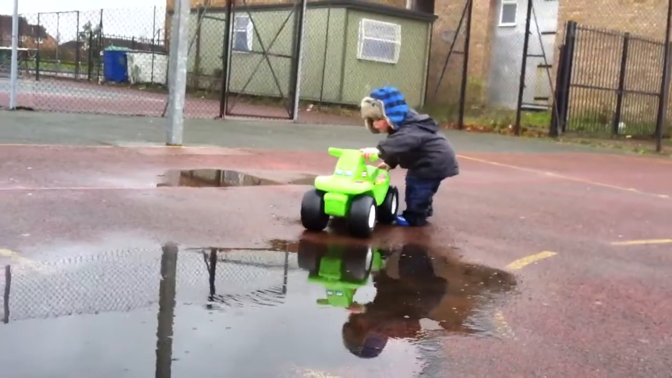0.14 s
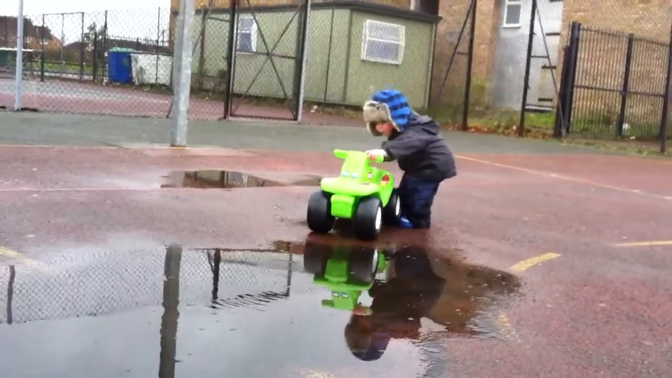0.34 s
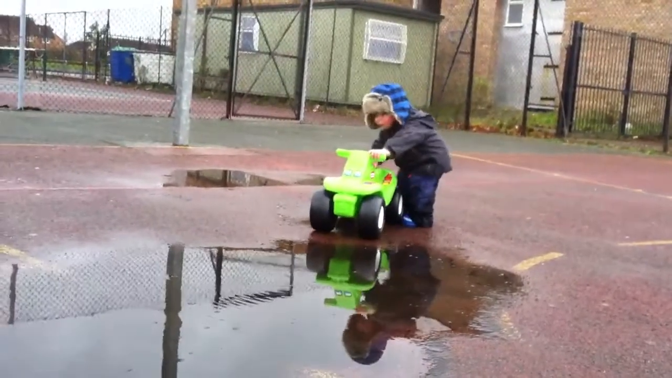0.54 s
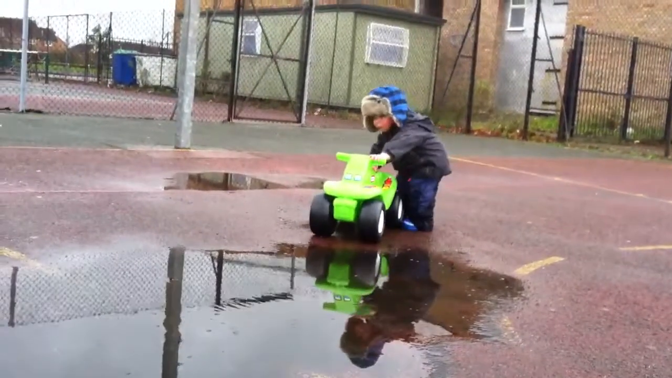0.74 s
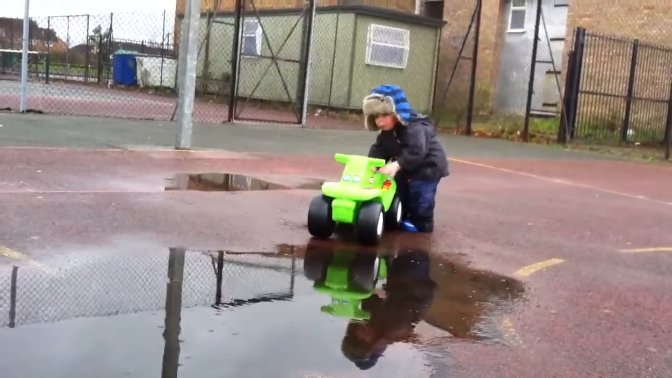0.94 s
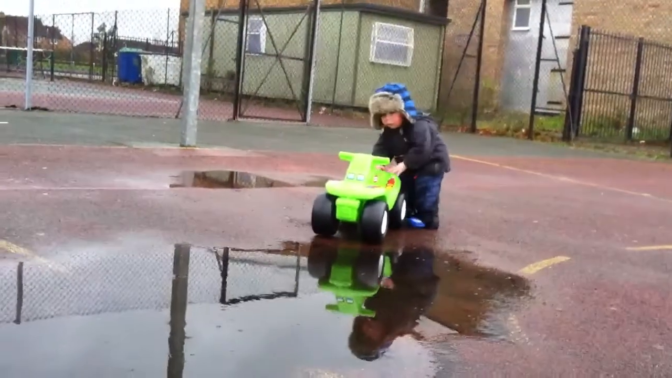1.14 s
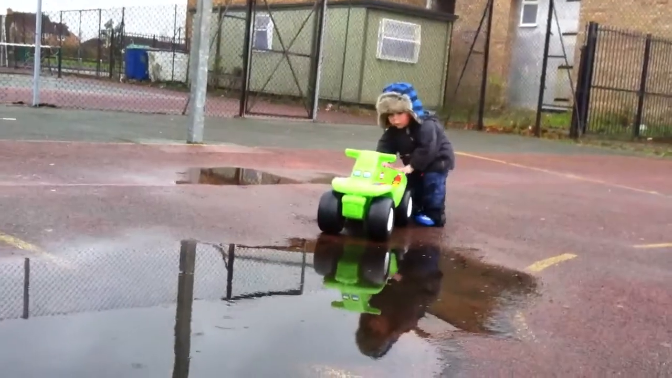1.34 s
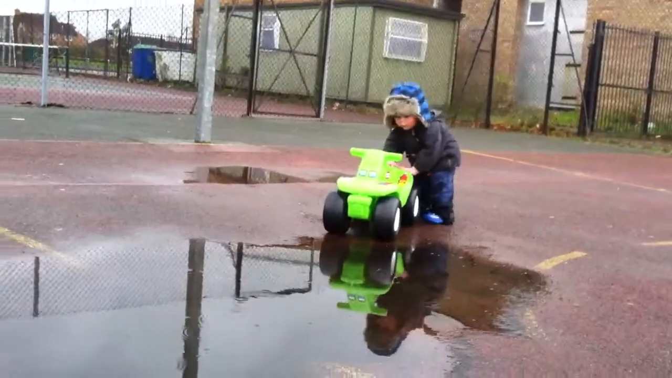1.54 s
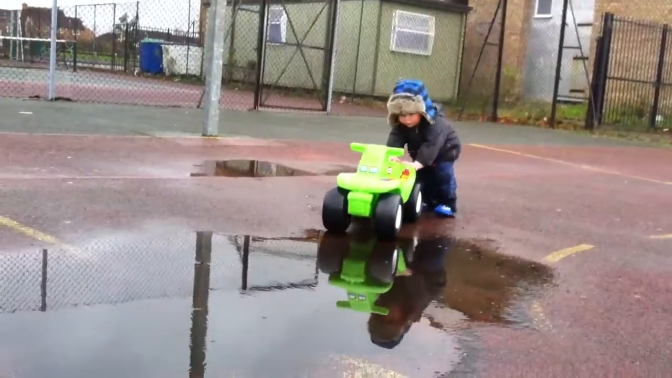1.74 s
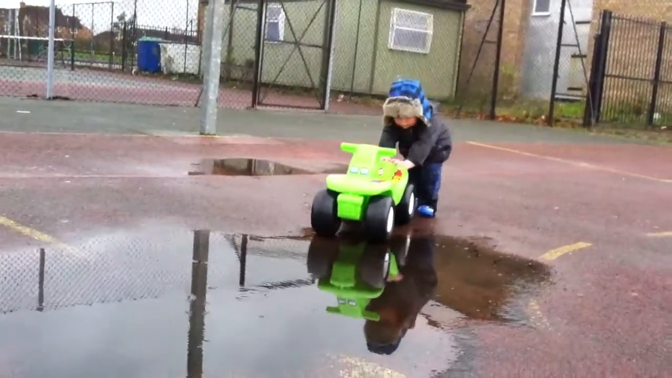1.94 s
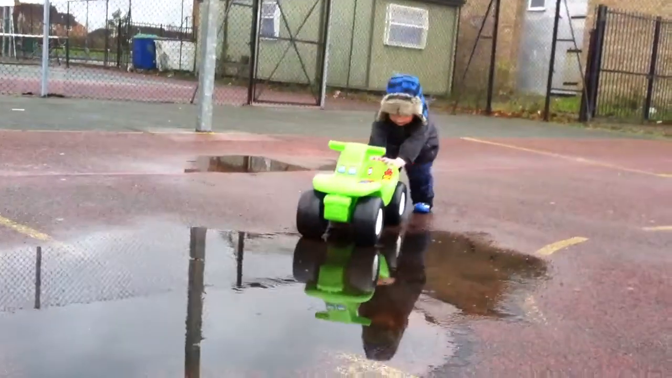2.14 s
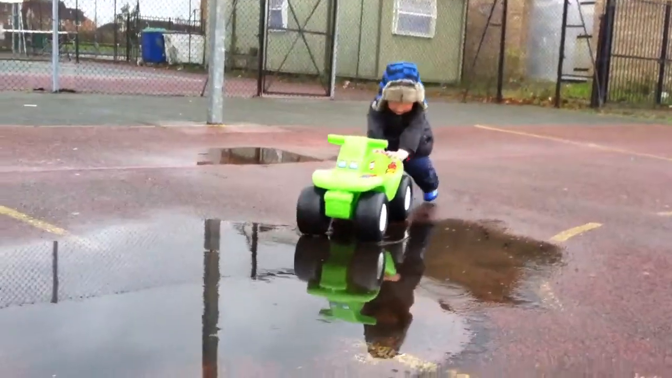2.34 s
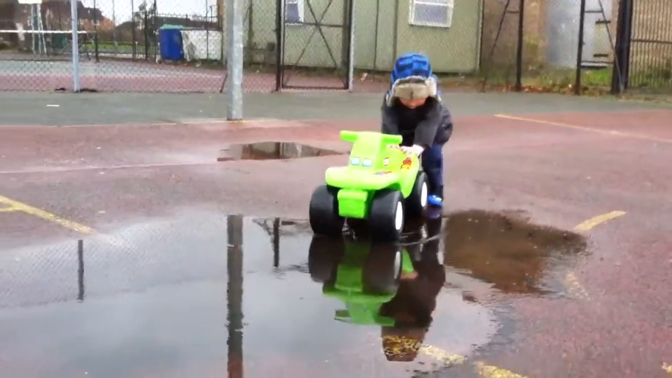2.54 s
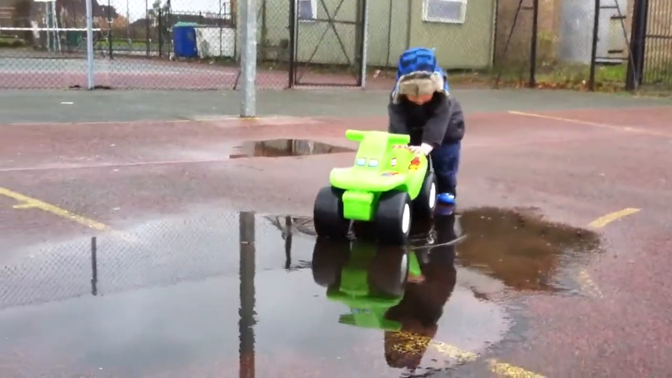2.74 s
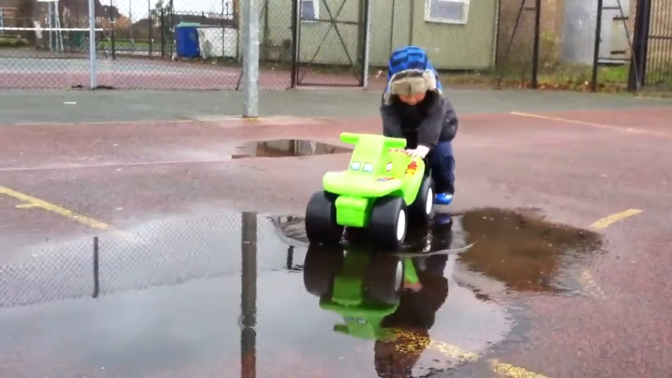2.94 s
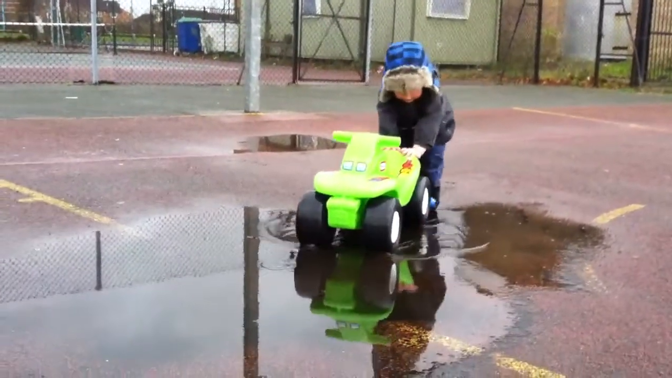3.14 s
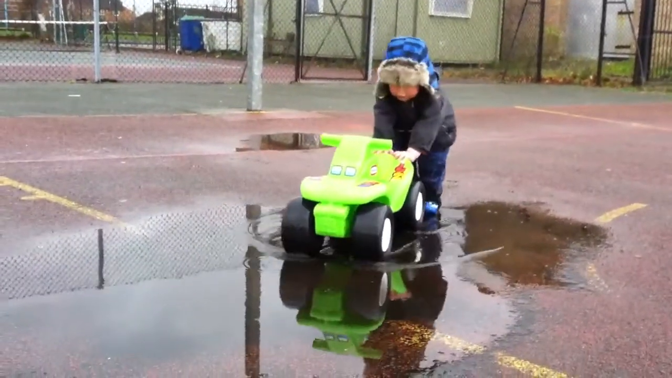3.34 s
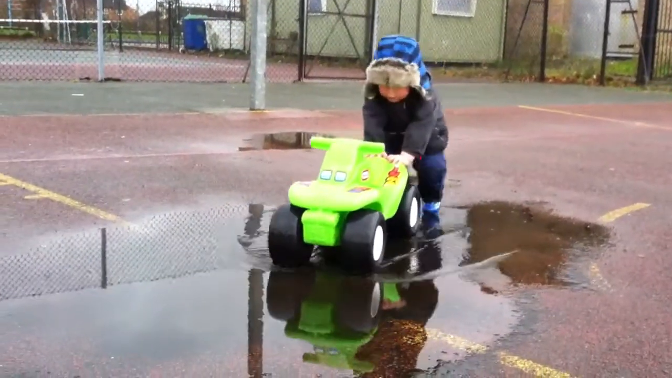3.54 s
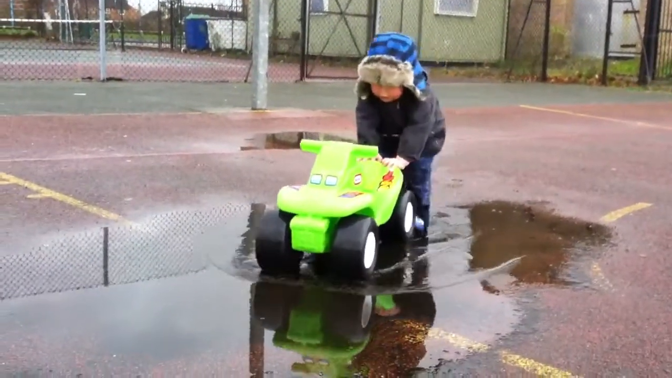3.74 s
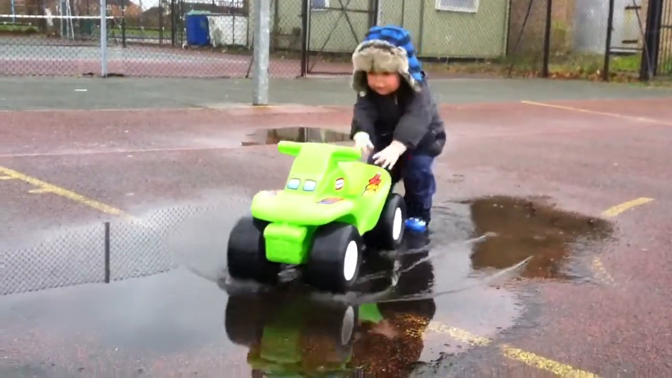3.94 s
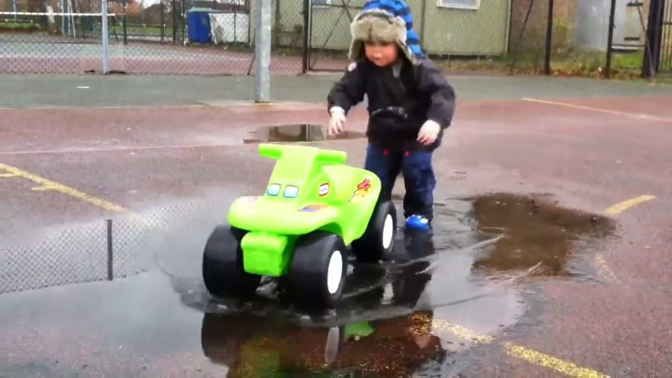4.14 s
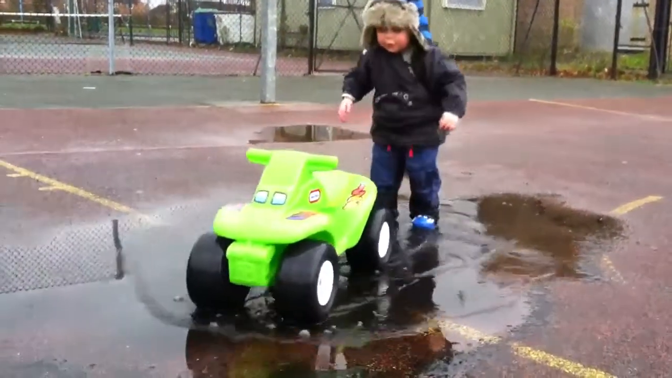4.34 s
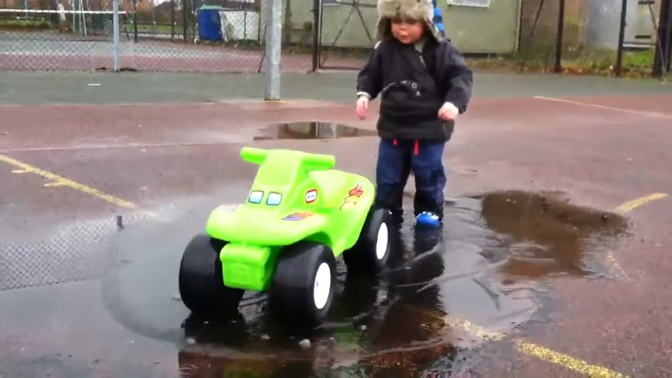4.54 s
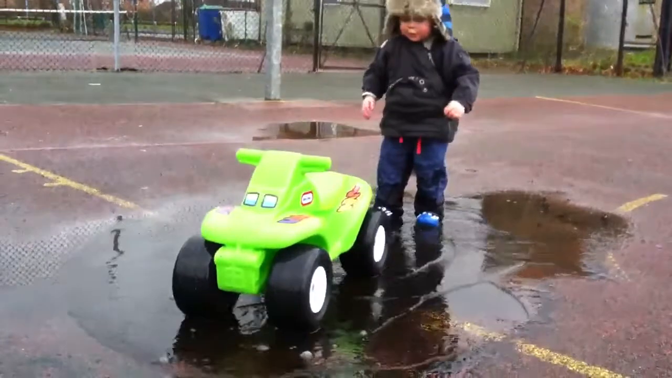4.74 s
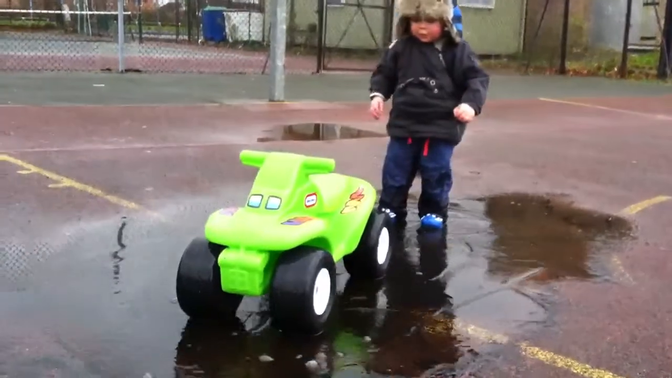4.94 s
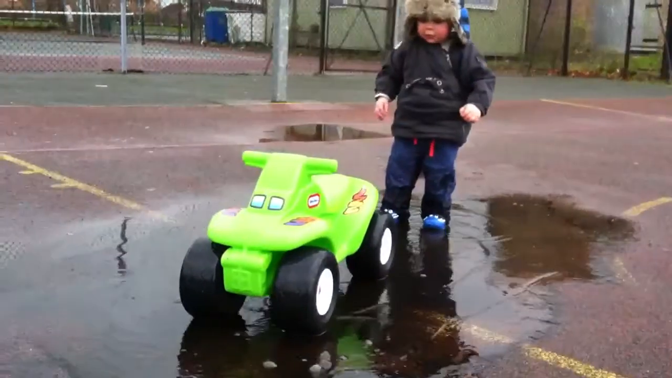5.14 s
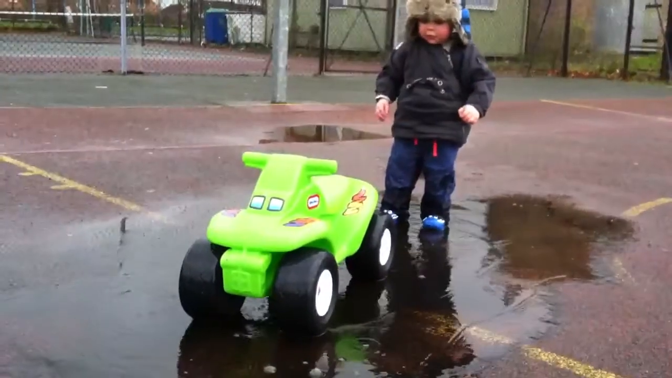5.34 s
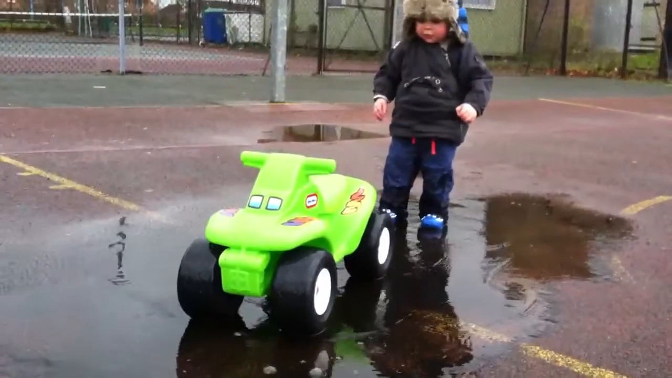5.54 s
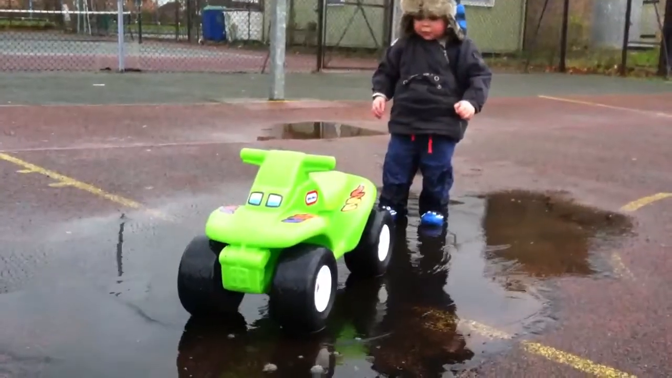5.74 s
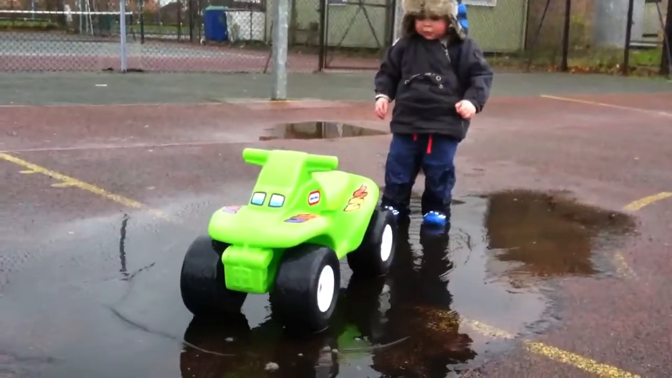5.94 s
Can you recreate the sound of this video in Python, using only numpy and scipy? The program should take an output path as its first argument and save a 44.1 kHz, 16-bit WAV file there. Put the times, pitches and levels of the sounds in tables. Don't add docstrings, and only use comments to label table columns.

```python
import sys
import numpy as np
from scipy import signal
from scipy.io import wavfile
from scipy.ndimage import uniform_filter1d

SR = 44100
rng = np.random.default_rng(int(sys.argv[2]) if len(sys.argv) > 2 else 0)


def natural_amplitude(level_db):
    exponent = np.asarray(level_db, float) / 20
    return 10 ** exponent


def dump(signal):
    limited = np.clip(np.atleast_2d(signal).T, -1, 1)
    pcm = np.round(limited * 32767).astype(np.int16)
    wavfile.write(sys.argv[1], SR, pcm)


N = 264159

# pitch_hz, width_hz, level_db
SHELL_MODES = [(280, 36, 2), (410, 80, 0.5), (659, 62, 2.5), (950, 250, -11), (1190, 156, -10)]
# pitch_hz, width_hz, level_db
AXLE_MODES = [(1580, 47, 4), (1754, 97, -1), (2173, 400, -6)]
# pitch_hz, width_hz, level_db
PANEL_MODES = [(3180, 250, 6.5), (4670, 84, 6.5), (7600, 340, -14), (10100, 4300, 3.5)]


def rms_one(x):
    return x / np.sqrt(np.mean(x ** 2) + 1e-20)


def in_time(rows):
    s, *columns = np.transpose(rows)
    return [np.interp(np.arange(N) / SR, s, c) for c in columns]


def cut(x, hz, kind, order=2):
    sos = signal.butter(order, np.clip(hz, 10, .45 * SR), kind, fs=SR, output="sos")
    return signal.sosfilt(sos, x)


def drift(rate_hz):
    r = np.exp(-80 * np.pi * rate_hz / SR)
    slow = signal.lfilter([1], [1, -2 * r, r * r], rng.standard_normal(N // 40 + 2002))[2000:]
    return np.interp(np.arange(N) / 40, np.arange(len(slow)), rms_one(slow))


def resonate(x, modes):
    out = 0
    for k, (hz, width_hz, level_db) in enumerate(modes):
        r = np.exp(-np.pi * width_hz / SR)
        b = [(1 - r * r) / 2, 0, (r * r - 1) / 2]
        a = [1, -2 * r * np.cos(2 * np.pi * hz / SR), r * r]
        out = out + (-1) ** k * natural_amplitude(level_db) * signal.lfilter(b, a, x + 1e-18)
    return out


def grains(per_s, spread_db):
    sizes = natural_amplitude(spread_db * np.minimum(rng.exponential(1, N), 4)) * rng.choice([-1, 1], N)
    return rms_one(sizes * (rng.random(N) < per_s / SR))


def add(track, s, piece):
    i = max(round(s * SR), 0)
    track[i:i + len(piece)] += piece[:N - i]


def lasting(events, t60_s):
    return [(*row, t60_s) for row in events]


def blows(events, rise_cycles, wobble, apart=0.227):
    out, t = np.zeros(N), np.arange(round(.2 * SR)) / SR
    chance = rng.uniform(-1.28, 1, (len(events), 2))
    for (s, peak_db, hz, t60_s), (detune, turn) in zip(events, chance):
        swell = 1 - np.exp(-(t * hz / rise_cycles) ** 2)
        shape = swell * natural_amplitude(-60 * t / max(t60_s, .008))
        partner = np.sin(2 * np.pi * hz * (1 + apart * detune) * t + np.pi * turn)
        tone = np.sin(2 * np.pi * hz * t) + wobble * partner
        add(out, s, natural_amplitude(peak_db) * tone * shape / shape.max())
    return out


def crushed():
    # start_s, peak_db, bright_db, t60_s
    cracks = [(.058, -28.5, -19.5, 0.037), (.167, -37, -3, 0.017), (.36, -37, -4, 0.04),
              (1.6278, -22.5, -23, 0.043), (1.6356, -27.5, -18, 0.041), (1.691, -35.5, -4, 0.035),
              (1.771, -20, -28, 0.057), (1.7908, -33, -23, 0.07), (1.8895, -31, -19, 0.068),
              (2.064, -32, -10.5, 0.036), (2.0747, -22.5, -10, 0.026), (2.2183, -32.5, -8, 0.03),
              (2.299, -39.5, -20, 0.056), (2.4842, -43, 6, 0.0048), (2.6323, -26, -16, 0.029),
              (2.6546, -39, 5, 0.062), (2.8344, -32, -3.5, 0.05), (2.8422, -29.5, -7, 0.026),
              (2.8883, -33, -8.5, 0.045), (3.0437, -31.5, -2, 0.022), (3.0819, -33.5, -6, 0.028),
              (3.1397, -37.5, 2, 0.027), (3.1844, -32.5, -7.5, 0.032), (3.644, -33.5, -6, 0.041),
              (3.895, -24, -3, 0.023), (3.8998, -29, 10, 0.031), (3.939, -27, -10.5, 0.036),
              (4.0402, -37.5, 0.5, 0.076), (4.543, -31.5, -14, 0.044)]
    # start_s, peak_db, bright_db
    grinds = [(.136, -41, -6), (.194, -36, -11), (0.261, -42, -7), (.283, -44, -3), (0.311, -38.5, -8.5),
              (.3314, -43, -12), (.742, -48.5, -10), (0.884, -45.5, -16), (1.6544, -46, -5),
              (1.716, -34.5, -6.5), (1.749, -38, -14), (1.8497, -34.5, -13), (2.0465, -43.5, -27),
              (2.526, -42, -4), (3.008, -38, -2.5), (3.462, -32, -18), (3.581, -37.5, -4),
              (3.839, -33, -14), (4.128, -42.5, -9), (4.315, -37, -11.5), (4.336, -44, -9),
              (4.479, -42.5, -15), (4.811, -45, -7)]
    # start_s, peak_db, bright_db
    ticks = [(0.22, -38, -6), (0.369, -45, -4), (0.6132, -43, -7), (0.781, -40, -5), (.7395, -46, -9),
             (.761, -45, -2), (.791, -48, -4), (1.981, -42, -15), (1.938, -46, -8), (.204, -57, -8),
             (.9105, -46, -7), (0.956, -44.5, -17), (1.1992, -43, -27), (1.2304, -43.5, -23),
             (1.8094, -32, -15), (1.927, -38, -7.5), (2.153, -35, -17), (2.3196, -36, -10.5),
             (2.734, -41, -20), (2.811, -37, -15), (2.99, -41, -18), (3.205, -42, -1), (3.3243, -48, -6),
             (3.414, -45.5, 2.5), (3.701, -39, -25), (3.7808, -44, -9), (3.8272, -36.5, -4.5),
             (3.978, -32, -12), (4.0187, -36, -17), (4.033, -21, -5), (4.042, -36, 5), (4.054, -53, -11),
             (3.908, -43, -2), (3.93, -35, -3), (4.373, -41, -24), (4.437, -36.5, -14),
             (4.647, -37.5, -10.5), (4.8506, -38.5, -9), (2.556, -56, -10), (2.679, -45, -17),
             (2.858, -29.5, -13), (2.91, -45, -11), (3.272, -45, -2), (3.515, -37, -11), (3.604, -50, -17),
             (3.713, -52, -19), (4.175, -45, -16), (4.298, -49, -14), (4.355, -64, -12), (4.503, -56, -18),
             (4.562, -42, -15), (.373, -49, -8)]
    rows = cracks + lasting(grinds, t60_s=0.079) + lasting(ticks, t60_s=.028)
    return [(s, db, bright_db, -47 + 0.72 * (db + 32.0) - db, t60_s) for s, db, bright_db, t60_s in rows]


def crunches(uneven_db):
    # low_hz, high_hz, bright_share (0-1), level_db
    rasp_bands = [(2080, 4000, 0, -9.5), (3535, 6240, 0.15, -5), (5410, 8250, 0.6, -3),
                  (7380, 11200, 0.73, -0.5), (9870, 14400, 0.7, -11)]
    # start_s, peak_db
    splits = [(.1685, -33), (1.631, -31), (1.637, -31), (1.639, -26), (1.770, -31), (2.0775, -24.5),
              (2.0795, -27), (2.301, -33), (2.4865, -32), (2.8445, -25), (3.046, -30), (3.0845, -33),
              (3.1865, -33), (3.9017, -18), (4.0352, -26), (4.0432, -26)]
    # start_s, peak_db
    splinters = [(0.0618, -36), (0.1404, -36), (0.2039, -38), (0.2199, -41), (0.3324, -39), (0.6163, -44),
                 (0.7402, -47), (0.9123, -49), (1.1983, -48), (1.2311, -45), (1.6965, -30), (1.724, -34.5),
                 (1.7513, -36), (1.7724, -31), (1.8094, -41), (1.8904, -41), (2.2198, -34), (2.319, -33),
                 (2.6324, -34.5), (2.6563, -30), (2.7332, -45), (2.8903, -33), (3.1388, -35),
                 (3.465, -34.5), (3.6461, -37), (3.7114, -50), (3.8397, -41), (3.9409, -38), (3.9789, -41),
                 (4.1265, -43), (4.4414, -51), (4.5455, -47), (4.6514, -47), (4.8524, -53)]
    swell_share, stop_power = .11, 1.9
    events = crushed()
    bands = np.zeros((len(rasp_bands), N))
    axle, snaps = np.zeros((2, N))
    t = np.arange(round(.2 * SR)) / SR
    colour = rng.standard_normal((len(events), len(rasp_bands)))
    for (s, peak_db, bright_db, axle_db, t60_s), luck in zip(events, colour):
        swell = np.minimum(t / np.clip(swell_share * t60_s, .001, .012), 1)
        shape = natural_amplitude(peak_db - 60 * (t / max(t60_s, .005)) ** stop_power) * swell
        add(axle, s, shape * natural_amplitude(axle_db))
        for band, (low, high, share, level_db), own in zip(bands, rasp_bands, luck):
            add(band, s, shape * natural_amplitude(level_db + share * bright_db + uneven_db * own))
    for s, peak_db in splits + [(s, db - 2.0) for s, db in splinters]:
        add(snaps, s, natural_amplitude(peak_db + 7) * np.ones(1))

    crackle = natural_amplitude(2.5 * drift(200)) * grains(per_s=4500, spread_db=3.5)
    crackle = crackle + .15 * rng.standard_normal(N)
    crackle = crackle / np.sqrt(uniform_filter1d(crackle ** 2, size=500))
    rasp = sum(cut(band * crackle, [low, high], "band")
               for band, (low, high, *_) in zip(bands, rasp_bands))
    rasp = rasp + natural_amplitude(-9.0) * resonate(rasp, PANEL_MODES)
    axle_ring = natural_amplitude(11.5) * resonate(axle * crackle, AXLE_MODES)
    return rasp + axle_ring + cut(snaps, [2500, 12500], "band")


def rumble_level():
    # start_s, rumble_db
    speed_curve = [(0, -56), (.08, -51.5), (.37, -53.5), (.41, -66.5), (1.6, -68), (1.82, -47.5),
                   (1.92, -57.5), (2.07, -50.5), (2.3, -47.5), (2.6, -52.5), (3.1, -53), (3.59, -48.5),
                   (3.74, -52.5), (4.05, -41), (4.44, -52.5), (4.59, -53.5), (4.85, -70), (5.99, -70)]
    return in_time(speed_curve)[0]


def grit_level(rumble_db):
    depth = np.interp(np.arange(N) / SR, [3.8, 4.6], [0, 1])
    under_db, most_db, drowned_db = 15, -65, 4
    return np.minimum(rumble_db - under_db, most_db) - drowned_db * depth


def rolling(rumble_db, grit_db, ring_db):
    clumps = natural_amplitude(3.5 * drift(25))
    rumble = rms_one(resonate(clumps * grains(per_s=900, spread_db=2.0), SHELL_MODES))
    ring = rms_one(resonate(clumps * grains(per_s=270, spread_db=-4.0), AXLE_MODES))
    fizz = cut(natural_amplitude(4.0 * drift(37)) * grains(per_s=4900, spread_db=3.0), [2000, 13000], "band")
    fizz = rms_one(fizz + natural_amplitude(-14) * resonate(fizz, PANEL_MODES))
    return natural_amplitude(rumble_db) * rumble + natural_amplitude(ring_db) * ring + natural_amplitude(grit_db) * fizz


def knocks(judder_s):
    # start_s, peak_db, pitch_hz
    wheel_knocks = [(0.06, -28, 643), (0.091, -37.5, 576), (0.104, -40, 694), (0.158, -41, 628),
                    (0.207, -36.5, 567), (0.216, -38.5, 625), (0.227, -41, 634), (0.278, -53, 646),
                    (0.316, -47, 645), (0.331, -40, 630), (0.355, -46, 589), (1.819, -46, 571),
                    (1.819, -49, 665), (2.048, -38.5, 574), (2.214, -39, 636), (2.237, -41, 664),
                    (2.274, -38.5, 574), (2.345, -44, 690), (2.368, -41, 636), (2.398, -37, 637),
                    (2.419, -39, 587), (2.51, -43, 634), (2.844, -30.5, 678), (2.894, -39, 659),
                    (2.92, -37.5, 595), (2.934, -50, 689), (2.968, -50, 636), (3.045, -49, 643),
                    (3.118, -49, 662), (3.143, -35.5, 663), (3.187, -46, 589), (3.207, -41, 668),
                    (3.345, -42, 657), (3.366, -37, 660), (3.403, -38, 604), (3.443, -55, 651),
                    (3.462, -35, 638), (3.543, -33.5, 653), (3.593, -40, 668), (3.636, -34.5, 657),
                    (3.711, -29.5, 592), (3.727, -34.5, 745), (3.869, -39, 640), (3.937, -32.5, 610),
                    (3.972, -41, 670), (4.049, -36, 600), (4.084, -29.5, 650), (4.13, -29, 648),
                    (4.174, -40, 720), (4.294, -41, 620), (4.343, -41, 687), (4.441, -34, 697),
                    (4.459, -37, 628), (4.543, -45.5, 624), (4.652, -37, 647)]
    # start_s, peak_db, pitch_hz
    body_knocks = [(.157, -40, 653), (0.0648, -32, 430), (.1, -40.5, 546), (.619, -44, 425),
                   (.624, -48, 516), (2.085, -36.5, 412), (2.301, -36.5, 864), (2.634, -40.5, 410),
                   (2.733, -33.5, 584), (2.795, -47, 410), (2.893, -41, 367), (3.78, -42.5, 514),
                   (3.845, -34.5, 474), (4.003, -31, 480), (4.028, -35, 447), (4.121, -26.5, 538),
                   (4.231, -34, 410), (4.258, -36, 790), (4.375, -38, 450), (4.543, -38, 377),
                   (4.648, -37, 438), (2.42, -39.5, 420), (3.935, -40, 399)]
    push, t = np.zeros(N), np.arange(round(.06 * SR)) / SR
    jolts = [(s, db - 0.5, hz) for s, db, hz in wheel_knocks] + body_knocks
    for s, peak_db, hz in jolts:
        add(push, s, natural_amplitude(peak_db) * t / judder_s * np.exp(1 - t / judder_s))
    dull_modes = [(1060, 940, -19.5), (450, 420, -7.5)]   # pitch_hz, width_hz, level_db
    thud = resonate(push * grains(per_s=3000, spread_db=-0.5), SHELL_MODES + dull_modes)
    lead = blows(lasting(jolts, t60_s=0.053), rise_cycles=1.28, wobble=0.49, apart=0.15)
    return natural_amplitude(7.5) * thud + natural_amplitude(-4.0) * lead


def pings_and_drops():
    # start_s, peak_db, pitch_hz
    chips = [(0.0598, -35, 1070), (0.1983, -40, 1970), (.222, -38, 1580), (.278, -43, 1580),
             (.317, -43, 1580), (1.6377, -42, 2060), (1.7722, -22, 1580), (1.8078, -28.5, 1580),
             (1.8921, -35, 1570), (2.028, -36, 1580), (2.0777, -26.5, 2210), (2.3003, -35.5, 1620),
             (2.341, -37.5, 1580), (2.6336, -56, 1510), (2.8449, -30, 1793), (2.8904, -38, 1510),
             (3.185, -44, 1210), (3.458, -33.5, 1207), (3.8413, -33, 1640), (3.896, -40, 1150),
             (3.9414, -35, 1136), (4.0213, -33, 1180), (4.0397, -31, 1260), (4.1316, -46, 1560),
             (4.171, -30.5, 1340), (4.258, -37, 1580), (.088, -47, 1580), (.152, -48, 2320),
             (.2633, -39, 1580), (.34, -52, 1580), (.39, -53, 1580), (1.721, -41, 1650), (1.781, -25, 1580),
             (1.797, -42, 1590), (1.82, -40, 1580), (1.8582, -46, 1540), (1.875, -41, 2270),
             (2.156, -38.5, 1553), (2.4219, -42, 1640), (2.5456, -44, 1360), (3.046, -44, 2020),
             (3.0839, -45, 2140), (3.1423, -45.5, 1540), (3.415, -46, 2230), (3.712, -40, 1594),
             (4.2158, -40, 1490), (4.3765, -45, 2200), (4.339, -43, 1590)]
    # start_s, peak_db, pitch_hz
    falling_drops = [(0.0623, -34, 3150), (.0625, -41, 4270), (.221, -48, 4170), (4.13, -44, 5500),
                     (4.056, -48, 6760), (4.205, -48, 3200), (1.637, -41, 3200), (3.8282, -37.5, 3620),
                     (4.0348, -28.5, 3600), (4.1927, -43, 3180), (4.2413, -38.5, 2900),
                     (2.892, -34.5, 3390), (2.862, -45, 3480), (3.207, -43, 3250), (3.275, -56, 3400),
                     (3.325, -47, 3450), (3.512, -50, 3520), (3.545, -45, 3320), (3.618, -43, 3050),
                     (3.645, -38, 3420), (4.318, -42, 2900), (4.355, -47, 3230), (4.652, -53, 3320),
                     (.362, -44, 4720), (.373, -46, 4600), (1.93, -47, 4170)]
    events = lasting(chips, t60_s=0.05) + lasting(falling_drops, t60_s=0.033)
    return natural_amplitude(-10.0) * blows(events, rise_cycles=0.96, wobble=0.66, apart=0.074)


def droplets(grit_db, cycles):
    born, dealt = grains(per_s=300, spread_db=4.0), rng.integers(0, 16, N)
    rings = 0
    for k, hz in enumerate(np.geomspace(1200, 7000, 16)):
        ring = resonate(born * (dealt == k), [(hz, 0.53 * hz / cycles, 0)])
        rings = rings + ring * np.sqrt(cycles / hz)
    return natural_amplitude(grit_db - 8) * rms_one(rings)


def rubbing():
    # start_s, end_s, level_db
    rubs = [
        (0.726, 0.99, -74.5),
        (4.425, 4.613, -76),
    ]
    t, level = np.arange(N) / SR, 0
    for start, end, level_db in rubs:
        fade = np.interp(t, [start, start + 0.035, end - .04, end], [0, 1, 1, 0])
        level = level + natural_amplitude(level_db) * fade
    hiss = resonate(natural_amplitude(1.0 * drift(13)) * rng.standard_normal(N), [(4240, 260, 0)])
    return level * rms_one(resonate(hiss, [(4260, 990, 0)]))


def court(x):
    # delay_s, level_db
    echoes = [
        (.011, -30),
        (.027, -17),
        (0.051, -24),
    ]
    out, dull = x.copy(), cut(x, 6500, "low")
    for s, level_db in echoes:
        add(out, s, natural_amplitude(level_db) * dull)
    return out


def wind():
    # start_s, level_db
    gust_curve = [(0, -52), (.22, -52), (.37, -61.5), (1.02, -60.5), (1.43, -63.5), (1.7, -54),
                  (2.17, -49.5), (2.47, -46), (2.62, -47), (3.15, -55), (3.67, -40.5), (3.98, -43.5),
                  (4.34, -45), (4.65, -53), (5.17, -61), (5.46, -55), (5.7, -64), (5.86, -53.5)]
    level_db, = in_time(gust_curve)
    lumps = natural_amplitude(3.5 * np.minimum(drift(16), 1.2)) * rng.standard_normal(N)
    # pitch_hz, width_hz, level_db
    port_modes = [(30, 25, -2.0), (79.0, 60, -0.5), (147, 74.0, 6.5), (274, 150, 0.5)]
    return natural_amplitude(level_db) * rms_one(resonate(cut(lumps, 404, "low"), port_modes))


def eddies():
    # start_s, peak_db, pitch_hz, t60_s
    buffets = [(0.067, -32, 230, 0.042), (0.819, -45.5, 144, 0.041), (1.397, -40, 142, 0.047),
               (1.989, -41.5, 265, 0.1), (2.301, -34.5, 181, 0.041), (2.358, -33, 120, 0.081),
               (2.437, -38, 98, 0.2), (2.442, -22.5, 244, 0.012), (2.573, -28, 160, 0.059),
               (2.627, -26.5, 159, 0.061), (2.679, -30.5, 211, 0.042), (2.772, -30.5, 169, 0.019),
               (3.167, -26.5, 143, 0.032), (3.499, -38.5, 308, 0.056), (3.567, -27, 208, 0.034),
               (3.653, -27, 157.8, 0.1), (3.72, -25.5, 183, 0.028), (3.793, -30.5, 313, 0.04),
               (3.796, -17, 155, 0.014), (4.002, -26, 161, 0.13), (4.125, -39.5, 134, 0.09),
               (4.441, -42, 286, 0.26), (4.65, -36, 187, 0.07), (4.878, -41, 133, 0.028),
               (5.231, -41, 139, 0.038), (5.322, -40, 141, 0.037), (5.414, -42, 191, 0.029),
               (5.61, -45.5, 164, 0.042), (5.812, -39, 156, 0.074), (5.93, -31, 173, 0.022),
               (4.006, -17.5, 175, 0.025), (1.6, -55, 196, 0.035), (2.612, -33, 178.2, 0.094),
             (2.2, -33, 224, .05), (3.026, -40.5, 134, 0.075), (3.194, -35, 230, 0.019),
             (3.312, -44, 250, 0.044), (6.3, -41, 193, 0.032), (4, -26.5, 188, 0.071),
             (3.765, -38, 194, 0.033), (2.9, -41, 180, 0.065), (2.6, -43, 231, 0.046),
             (7.3, -50, 293, 0.048), (1.9, -43.5, 121, 0.077), (3.643, -26, 193, 0.015),
             (2.462, -32, 190, 0.025), (0.099, -38, 214, 0.053), (1.36, -48, 100, 0.075),
             (1.2, -50, 130, 0.025), (.11, -44, 180, .08), (3.6, -31.5, 164, 0.036),
             (4.815, -45, 69, 0.058), (5.53, -47, 98, 0.074), (5.838, -42, 100, 0.071)]
    return blows(buffets, rise_cycles=.9, wobble=.25)


def traffic(patchy_db):
    # pitch_hz, level_db (per Hz)
    spectrum = [(15, -60), (25, -12.5), (70, -20), (141, -7.5), (269, -4), (316, -12.5), (500, -7.5),
                (637, -14), (749, -7), (1150, -10.5), (2090, -19.5), (2590, -24.5), (15800, -34.5)]
    out, edges_hz = 0, 25 * 2 ** np.arange(0, 9.6, .5)
    white = rng.standard_normal((2, N))
    hz, level_db = np.transpose(spectrum)
    for k, (low, high) in enumerate(zip(edges_hz, edges_hz[1:])):
        gain_db = np.interp(np.log(low * high) / 2, np.log(hz), level_db) + patchy_db * drift(16.0)
        out = out + natural_amplitude(gain_db) * cut(white[k % 2], [low, high], "band")
    return natural_amplitude(-58.5) * rms_one(out)


def scene():
    rumble_db = rumble_level()
    grit_db = grit_level(rumble_db)
    toy = crunches(uneven_db=2.0) + rolling(rumble_db, grit_db, ring_db=rumble_db - 14.5)
    toy = toy + knocks(judder_s=0.0029) + pings_and_drops()
    toy = toy + droplets(grit_db, cycles=38.0) + rubbing()
    air = wind() + eddies()
    return (court(cut(toy, 138, "high")) + cut(air, 100, "high") + traffic(patchy_db=1.24))[None]


def thin_treble(x, patchy):
    # pitch_hz, reach_db (under the click)
    reach = [
        (2300, 40),
        (2900, 19),
        (5000, 14.5),
        (9000, 11),
        (16000, 10),
    ]
    frame_start, frame, block = 426, 1024, 128
    loud_db = -57
    lead = frame - frame_start - block // 2
    padded = np.concatenate([np.zeros(lead), x, np.zeros(2 * frame)])
    hz, _, z = signal.stft(padded, SR, nperseg=2 * block)
    z = z[:, :z.shape[1] // 8 * 8]
    broad_db, patch_db = (10 * np.log10(uniform_filter1d(abs(z) ** 2, bins, axis=0) + 1e-16) + 15
                          for bins in (24, 5))
    top_db = np.repeat(broad_db.reshape(len(hz), -1, 8).max(axis=2), 8, axis=1)
    reach_db = np.interp(hz, *np.transpose(reach))[:, None]
    under_db = top_db - broad_db - patchy * (patch_db - broad_db) - reach_db
    spared = (hz < reach[0][0])[:, None]
    kept = z * ((under_db < 0) | (top_db < loud_db) | spared)
    return signal.istft(kept, SR, nperseg=2 * block)[1][lead:lead + N]


def band_limit(x):
    return signal.sosfilt(signal.butter(12, 16830, fs=SR, output="sos"), x)


def record(dry):
    top = signal.cheby2(16, 45, 16150, fs=SR, output="sos")
    x = signal.sosfilt(top, cut(dry[0], 45, "high"))
    x = thin_treble(x, patchy=1.3)
    return band_limit(x[None])


dry = scene()
out = record(dry)
dump(out)
```